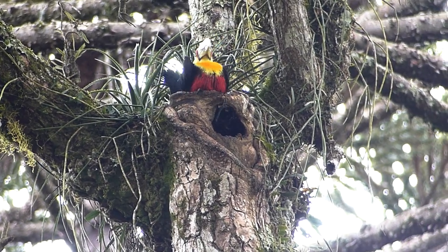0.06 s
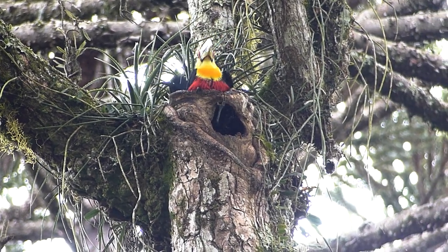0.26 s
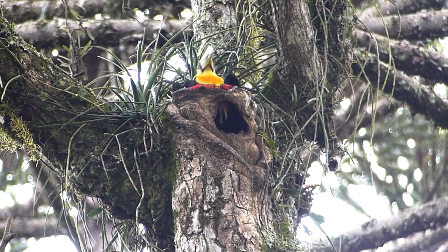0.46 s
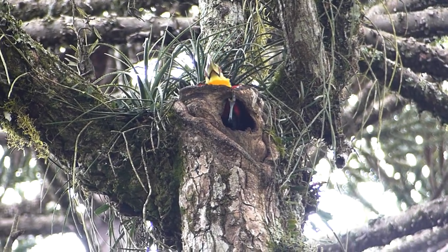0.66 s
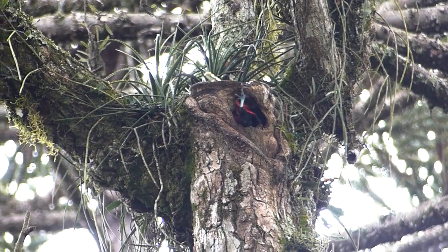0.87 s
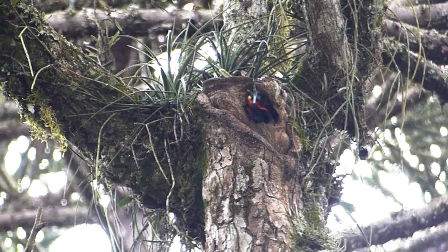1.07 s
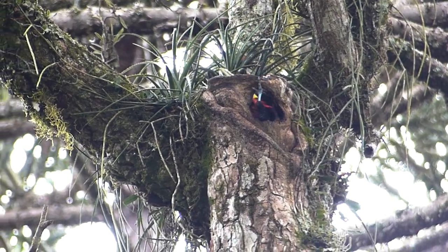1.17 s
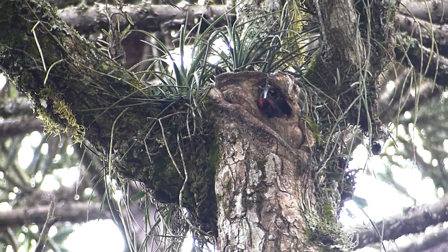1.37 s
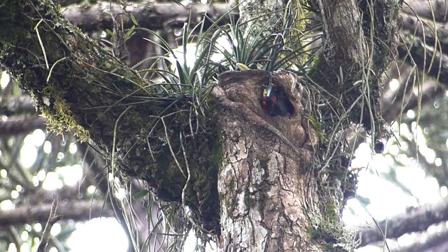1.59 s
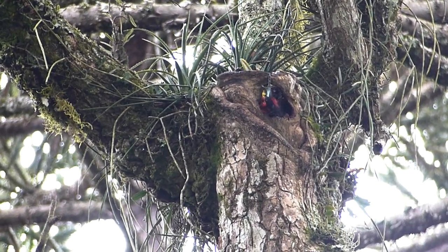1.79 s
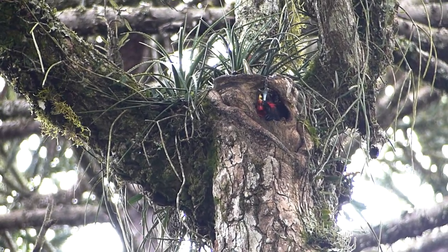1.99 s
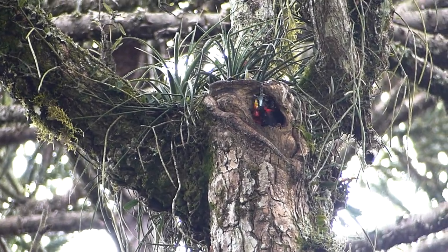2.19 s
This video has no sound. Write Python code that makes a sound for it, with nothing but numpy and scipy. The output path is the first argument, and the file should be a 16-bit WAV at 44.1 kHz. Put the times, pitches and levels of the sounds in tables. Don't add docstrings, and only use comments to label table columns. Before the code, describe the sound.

Single brief raspy toucan yelp among trees, then soft forest hush and a distant arching whistle

```python
import sys
import numpy as np
from scipy import signal
from scipy.io import wavfile

SR = 44100
rng = np.random.default_rng(int(sys.argv[2]) if len(sys.argv) > 2 else 0)


def ratio(d):
    e = np.asarray(d, float) / 20
    return 10 ** e


def generate_wav(sig):
    pcm = np.round(np.clip(np.atleast_2d(sig).T, -1, 1) * 32767).astype(np.int16)
    wavfile.write(sys.argv[1], SR, pcm)


N = 99225


def rms_one(x):
    return x / np.sqrt(np.mean(x ** 2) + 1e-20)


def in_time(rows):
    s, *columns = np.transpose(rows)
    return [np.interp(np.arange(N) / SR, s, column) for column in columns]


def at_hz(points, hz):
    table_hz, value = np.array(points)[:, 0], np.array(points)[:, 1]
    return np.interp(np.log(hz), np.log(table_hz + 1e-9), value)


def drift(rate_hz):
    r = np.exp(-2 * np.pi * rate_hz / SR)
    slow = signal.lfilter([1], [1, -2 * r, r * r], rng.standard_normal(N + SR))
    return rms_one(slow[SR:])


def band(x, low_hz, high_hz):
    sos = signal.butter(2, [low_hz, min(high_hz, .45 * SR)], "band", fs=SR, output="sos")
    return signal.sosfilt(sos, x)


def swell(start_s, length_s):
    progress = np.clip((np.arange(N) / SR - start_s) / length_s, 0, 1)
    return progress, np.sqrt(np.abs(np.sin(np.pi * progress)))


def piped(hz, level, throat):
    phase = np.cumsum(hz) * 2 * np.pi / SR
    return np.sqrt(2) * level * sum(ratio(at_hz(throat, k * hz)) * np.sin(k * phase) for k in range(1, 5))


# (frequency [Hz], T60 [s])
FOREST_T60 = [(1000, 0.8), (3000, 0.98), (6000, 1), (12000, 0.18)]
# (frequency [Hz], level [dB])
ECHO_TILT = [(1500, -2.5), (1760, 1.5), (2050, 0.5), (2550, 1.5), (3700, 0), (6500, -1), (8600, -1.5),
             (12000, -2)]


def place(x, pan_db, echo_db, stir=0, kept_dry=0):
    near_t60_s, near_db = 0.049, -2
    likeness = 0.59
    stir_hz = 140
    t, tail = np.arange(SR) / SR, 0
    edges = 700 * 2 ** np.arange(0, 4.6, 1 / 3)
    white = rng.standard_normal((2, 2, SR))
    for k, (low, high) in enumerate(zip(edges, edges[1:])):
        hz = np.sqrt(low * high)
        fade = ratio(-60 * t / at_hz(FOREST_T60, hz)) + ratio(near_db - 60 * t / near_t60_s)
        tail = tail + band(white[k % 2], low, high) * fade * ratio(at_hz(ECHO_TILT, hz))
    mid, side = tail
    tail = np.sqrt(1 + likeness) * mid + np.sqrt(1 - likeness) * side * [[1], [-1]]
    tail = tail * np.minimum(t / 0.0064, 1)
    scattered = (x - kept_dry) * (1 + stir * drift(stir_hz)) / np.hypot(1, stir)
    wet = signal.fftconvolve(scattered[None], tail * 0.02, axes=1)[:, :N]
    return (x + ratio(echo_db) * wet) * ratio([[pan_db / 2], [-pan_db / 2]])


# (frequency [Hz], level per Hz [dB])
HUSH = [(20, -14), (130, -5), (600, -5.5), (1000, -6), (2900, -18.5), (6300, -16), (10500, -19.5),
        (14900, -29)]
# (frequency [Hz], likeness [-1..1])
LIKENESS = [(60, 0.46), (130, 0.47), (290, -0.68), (630, -0.73), (1380, -0.076), (3010, 0.16), (6590, 0.62),
            (14400, 0.71)]
# (frequency [Hz], left minus right [dB])
LEAN = [(60, -0.5), (180, -2), (540, 0.5), (1610, -2), (4810, 0.5), (14400, -0.5)]


def hush():
    level_db = -62.5
    out, together = 0, drift(1.5)
    edges = 20 * 2 ** np.arange(0, 10.1, .5)
    white = rng.standard_normal((2, 2, N + SR))
    for k, (low, high) in enumerate(zip(edges, edges[1:])):
        mid, side = band(white[k % 2], low, high)[:, SR:]
        hz = np.sqrt(low * high)
        alike = np.clip(at_hz(LIKENESS, hz), -.95, .95)
        pair = np.sqrt(1 + alike) * mid + np.sqrt(1 - alike) * side * [[1], [-1]]
        pair = pair / np.sqrt(1 + alike)
        sway_db = 0.043 * together + 0.69 * drift(11.0)
        lean_db = at_hz(LEAN, hz) * np.array([[.5], [-.5]])
        out = out + ratio(at_hz(HUSH, hz) + sway_db + lean_db) * pair
    return ratio(level_db) * out / np.std(out.mean(axis=0))


# (centre [Hz], width [Hz], level [dB], throb [dB])
CHORUS = [
    (832.5, 32, -0.5, 2.5),
    (1134, 417, -3, 3.5),
    (1913, 80, -78.5, 3.5),
    (6005, 380, -75.5, 1.5),
    (6540, 83, -89, 2),
]
# (time [s], level [dB])
MURMUR = [(0.0, -62.5), (0.11, -79), (0.14, -60.5), (0.36, -74), (0.36, -58), (0.98, -71.5), (1.01, -60.5),
          (1.62, -75.5), (2.15, -64), (2.25, -102)]


def chorus():
    frogs_db = -74
    out, swells_db = 0, [frogs_db] + in_time(MURMUR) + [0, 0, 0]
    for (hz, width, db, throb_db), swell_db in zip(CHORUS, swells_db):
        mid, side = band(rng.standard_normal((2, N)), hz - width / 2, hz + width / 2)
        level = ratio(db + swell_db + throb_db * drift(4.5))
        out = out + level * rms_one(mid + .5 * side * [[1], [-1]])
    return out


def earlier_call():
    low_hz, top_hz = 1900, 3076
    level_db, t60_s = -60.5, 0.88
    white = rng.standard_normal((2, 2, N))
    swoop = rms_one(band(band(white[0], low_hz, top_hz), low_hz, top_hz))
    top = rms_one(band(white[1], top_hz - 120, top_hz))
    return (swoop + 0.81 * top) * ratio(level_db - 60 * np.arange(N) / SR / t60_s)


# (time [s], peak level [dB])
TICKS = [
    (0.929, -52),
    (0.954, -48.5),
    (0.9794, -53),
    (1.1933, -45),
    (1.2494, -58),
    (1.6145, -53),
    (1.6597, -55),
    (2.1094, -57),
    (1.1922, -57),
]
# (low edge [Hz], high edge [Hz])
TICK_HZ = [(5000, 10300)] * 3 + [(900, 5900)] + [(6500, 12000)] * 4 + [(4500, 11000)]


def ticks():
    tick_t60_s = 0.015
    knock_hz, knock_db, knock_t60_s = 1290, -49.5, 0.029
    out, size = np.zeros(N + SR), SR // 20
    t = np.arange(size) / SR
    fade = ratio(-60 * t / tick_t60_s)
    for (s, db), (low, high), white in zip(TICKS, TICK_HZ, rng.standard_normal((len(TICKS), size))):
        start = int(s * SR)
        out[start:start + size] += ratio(db - 7) * rms_one(band(white, low, high)) * fade
    start = int(TICKS[3][0] * SR)
    out[start:start + size] += ratio(knock_db - 60 * t / knock_t60_s) * np.sin(2 * np.pi * knock_hz * t)
    return out[:N]


# (start [s], length [s], level [dB])
CROAKS = [(.51, 0.069, -69.5), (0.692, 0.024, -62.5), (0.865, 0.059, -67.5), (0.926, 0.031, -64),
          (1.024, 0.043, -71), (1.138, 0.025, -59.5), (1.158, 0.019, -65), (1.192, 0.027, -61),
          (1.283, 0.03, -66), (1.309, 0.033, -65.5), (1.41, 0.02, -66), (1.823, 0.048, -69)]


def croaks():
    pitch_hz, waver_hz, level = 833, 17.6, 0
    for start_s, length_s, db in CROAKS:
        level = level + ratio(db) * swell(start_s, length_s)[1]
    phase = np.cumsum(pitch_hz + waver_hz * drift(41.6)) * 2 * np.pi / SR
    return place(np.sqrt(2) * level * np.sin(phase), pan_db=0, echo_db=-10)


# (start [s], length [s], first pitch [Hz], level [dB])
CHIRPS = [
    (0.452, 0.05, 1352, -75.5),
    (0.656, 0.089, 1363, -74),
    (0.878, 0.12, 1318, -77),
]
# (frequency [Hz], level [dB])
CHIRP_THROAT = [(1300, -4), (2800, -2.5), (4200, 1), (5600, -5)]


def chirps():
    rise, out = 0.08, 0
    for start_s, length_s, hz, db in CHIRPS:
        progress, envelope = swell(start_s, length_s)
        pitch_hz = hz * (1 + rise * progress) + 14 * drift(60.3)
        out = out + piped(pitch_hz, ratio(db + 4.2 * drift(50)) * envelope, CHIRP_THROAT)
    return place(out, pan_db=6.5, echo_db=0.5)


# (time [s], pitch [Hz], level [dB])
WHISTLE = [(1.755, 1600, -66), (1.782, 1695, -54.5), (1.8, 1810, -65), (1.813, 1890, -56.5),
           (1.835, 1893, -52.5), (1.862, 1893, -54), (1.869, 1893, -68), (1.893, 1890, -66)]
# (time [s], pitch [Hz], level [dB])
WHISTLE_FALL = [(1.903, 1868, -51), (1.918, 1805, -60), (1.95, 1670, -53.5), (1.978, 1569, -57),
                (2.006, 1450, -59.5), (2.05, 1324, -59), (2.08, 1283, -66), (2.25, 1195, -68)]
# (frequency [Hz], level [dB])
WHISTLE_THROAT = [(1200, -16), (1900, -10), (2500, -14.5), (3400, 0), (3850, -3.5), (4400, -22),
                  (5000, -29), (5700, -38)]
# (time [s], level [dB])
WHEEZE = [(1.69, -97), (1.74, -69), (1.77, -73), (1.85, -73.5), (2.05, -72), (2.25, -88)]


def whistle():
    breath_low_hz, breath_high_hz = 2840, 3990
    hz, db = in_time(WHISTLE + WHISTLE_FALL)
    level = ratio(db + 1.2 * drift(80)) * (np.arange(N) > WHISTLE[0][0] * SR)
    breath = band(rng.standard_normal(N), breath_low_hz, breath_high_hz)
    breath = rms_one(band(breath, breath_low_hz, breath_high_hz))
    wheeze = ratio(in_time(WHEEZE)[0] + 6.0 * drift(55)) * breath
    note = piped(hz + 6 * drift(119), level, WHISTLE_THROAT)
    return place(note + wheeze, pan_db=-3, echo_db=0)


# (time [s], pitch [Hz], level [dB])
LOW_RISE = [(.198, 2043, -78), (.21, 1950, -46), (.222, 1897, -40.5), (.236, 1963, -38),
            (.246, 2036, -47.5), (.259, 2190, -42), (.27, 1967, -43.5)]
# (time [s], pitch [Hz], level [dB])
LOW_HELD = [(0.28, 1748, -40), (.287, 1754, -37.5), (0.302, 1740, -34), (0.3058, 1477, -49),
            (.31, 1742, -35), (0.3232, 1759, -36.5), (0.326, 1744, -48), (0.331, 1680, -36),
            (0.343, 1728, -64.5)]
# (time [s], pitch [Hz], level [dB])
HIGH_FALL = [(.183, 4095, -80), (.193, 4120, -63), (.2, 3468, -60), (.208, 3310, -50.5), (.222, 3360, -55),
             (.231, 3027, -51), (.241, 2810, -49), (.254, 2778, -55.5), (.261, 3272, -79)]
# (time [s], pitch [Hz], level [dB])
HIGH_SWOOP = [(0.269, 3290, -58), (0.304, 3270, -55.5), (.315, 3090, -69), (0.321, 2939, -58),
              (0.33, 2580, -42), (.341, 2193, -48.5), (0.35, 2068, -43.5), (0.362, 1910, -39.5),
              (0.37, 1900, -84)]
MIXES = [(1, 1), (0, 2), (1, 2), (2, 1), (3, 0), (2, 0), (3, 1), (2, 2), (0, 3), (0, 4), (1, 3)]
MIX_DB = [-55.5, -77, -62, -64, -72, -73, -62, -72, -57, -72, -72]
# (time [s], level [dB])
RASP = [(.19, -22), (.205, -6.5), (.25, -2.5), (.28, -5.5), (.32, -9.5), (.35, -1.5), (.362, -10.5),
        (.375, -12)]
# (centre [Hz], width [Hz], level [dB])
BILL = [(3270, 1200, -58), (5190, 580, -61.5), (6600, 1100, -57), (8660, 1000, -53), (11900, 1500, -72.5)]


def toucan():
    jitter_hz, jitter_rate_hz, flutter_db = 10, 300, .8
    throb_hz, throb_db = 165, 1.23
    held_scattered = .3
    t = np.arange(N) / SR
    low_hz, low_db = in_time(LOW_RISE + LOW_HELD)
    high_hz, high_db = in_time(HIGH_FALL + HIGH_SWOOP)
    hoarse = 1 + 12.0 * (t > HIGH_FALL[-1][0]) * (t < HIGH_SWOOP[2][0])
    low_phase = np.cumsum(low_hz + jitter_hz * drift(jitter_rate_hz)) * 2 * np.pi / SR
    high_phase = np.cumsum(high_hz + hoarse * jitter_hz * drift(jitter_rate_hz)) * 2 * np.pi / SR

    throb = throb_db * np.sin(2 * np.pi * throb_hz * t)
    low_voice = ratio(low_db + flutter_db * drift(140) + throb) * np.sin(low_phase)
    high_voice = ratio(high_db + flutter_db * drift(140)) * np.sin(high_phase)
    held = np.interp(t, [LOW_RISE[-1][0], LOW_HELD[0][0]], [0, 1])
    kept_dry = np.sqrt(2) * (1 - held_scattered) * low_voice * held
    out = low_voice + high_voice

    low_on, high_on = np.minimum(ratio(low_db + 54), 1), np.minimum(ratio(high_db + 66), 1)
    high_alone = ratio(high_db + 46.5)
    effort = ratio(in_time(RASP)[0])
    for (m, n), db in zip(MIXES, MIX_DB):
        low_gate = low_on if m else 1
        high_gate = (high_on if m else high_alone) if n else 1
        level = effort * ratio(db + 1.9 * drift(160)) * low_gate * high_gate
        out += level * np.sin(m * low_phase + n * high_phase)
    out *= np.sqrt(2)

    for hz, width, db in BILL:
        hiss = rms_one(band(rng.standard_normal(N), hz - width / 2, hz + width / 2))
        out += effort * ratio(db + 3.15 * drift(116) + 2.6 * drift(22)) * hiss
    before_end = t < RASP[-1][0]
    out = out * (t > HIGH_FALL[0][0]) * before_end
    return place(out, pan_db=4, echo_db=-8.5, stir=1.5, kept_dry=kept_dry * before_end)


def scene():
    background = hush() + chorus() + earlier_call() + ticks()
    return background + croaks() + chirps() + whistle() + toucan()


def top_cut(x):
    return signal.sosfilt(signal.butter(12, 15010, fs=SR, output="sos"), x)


def record(dry):
    return top_cut(dry)


dry = scene()
out = record(dry)
generate_wav(out)
```